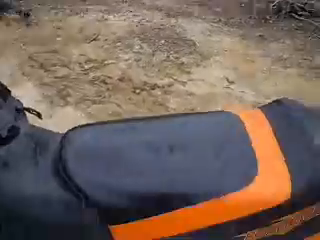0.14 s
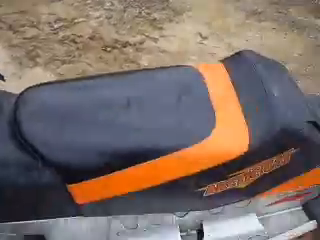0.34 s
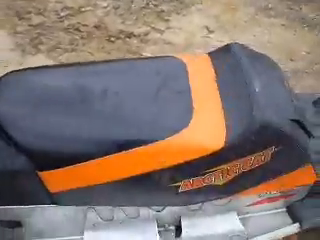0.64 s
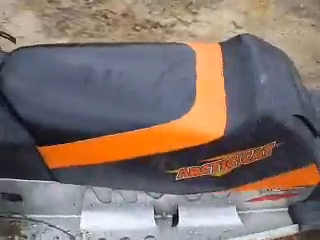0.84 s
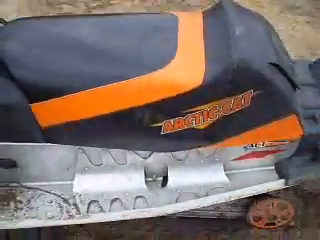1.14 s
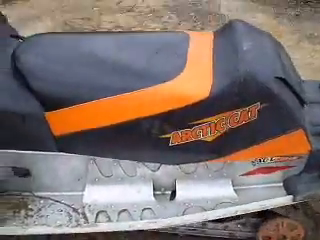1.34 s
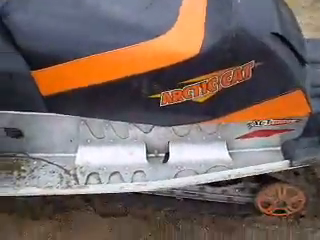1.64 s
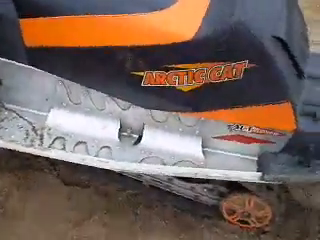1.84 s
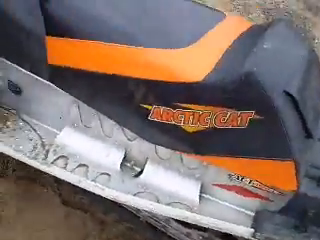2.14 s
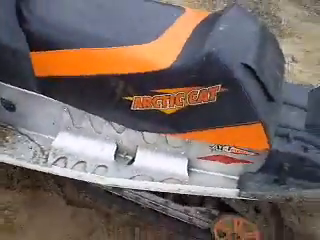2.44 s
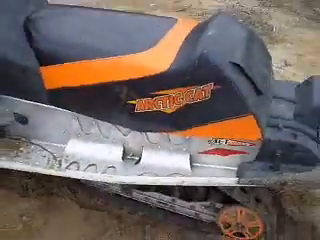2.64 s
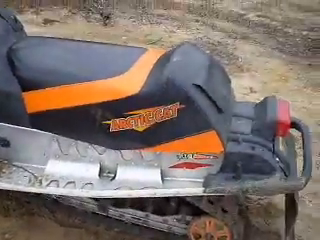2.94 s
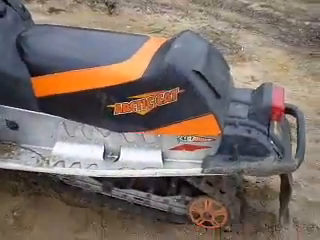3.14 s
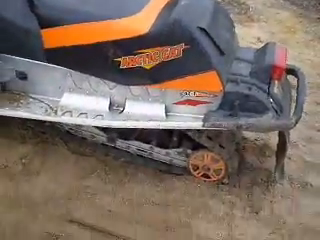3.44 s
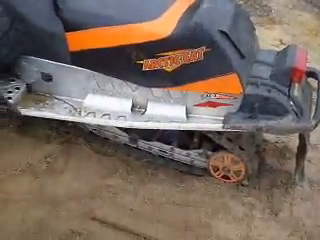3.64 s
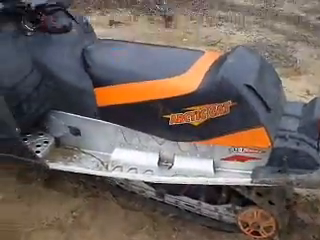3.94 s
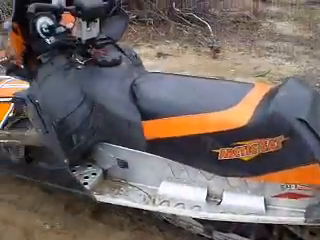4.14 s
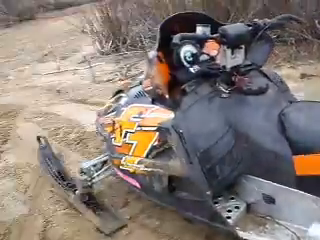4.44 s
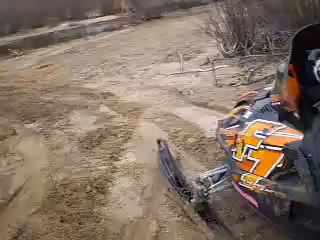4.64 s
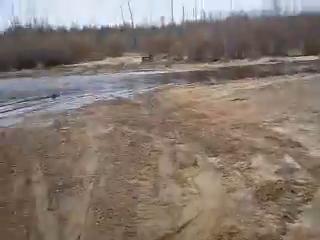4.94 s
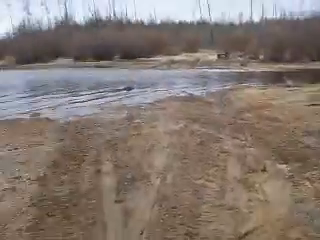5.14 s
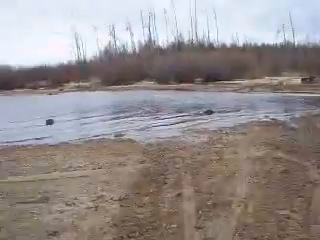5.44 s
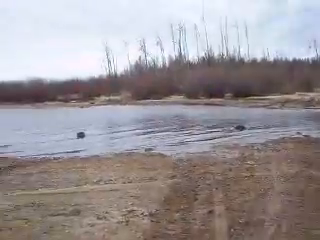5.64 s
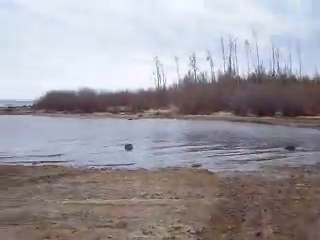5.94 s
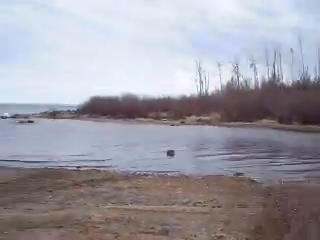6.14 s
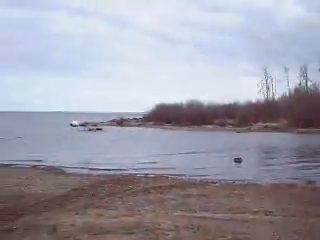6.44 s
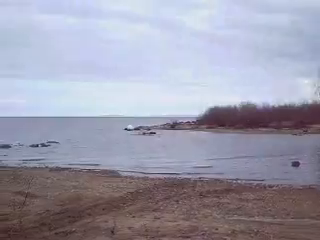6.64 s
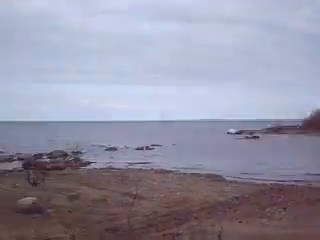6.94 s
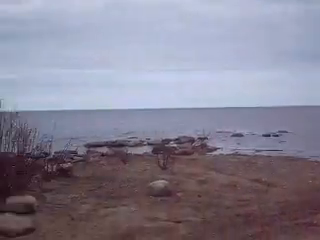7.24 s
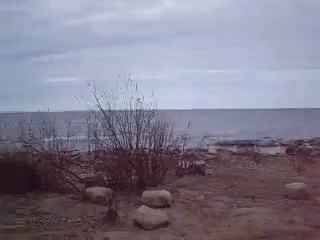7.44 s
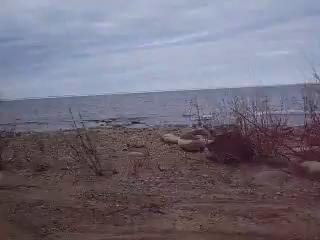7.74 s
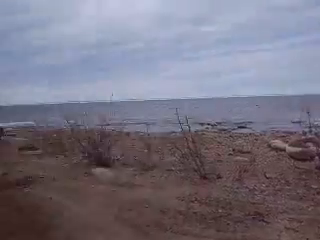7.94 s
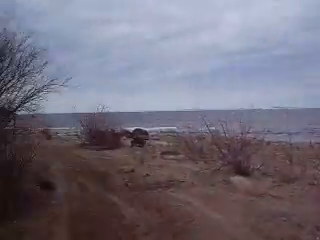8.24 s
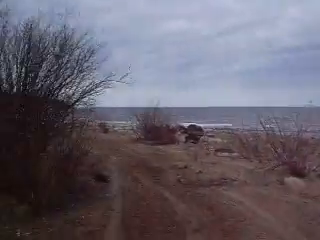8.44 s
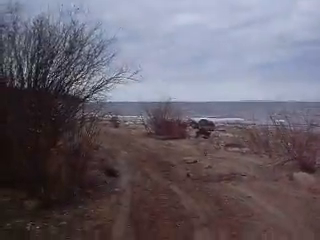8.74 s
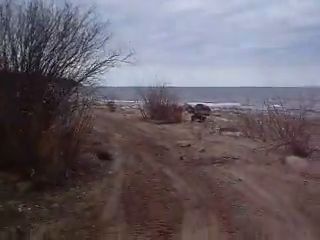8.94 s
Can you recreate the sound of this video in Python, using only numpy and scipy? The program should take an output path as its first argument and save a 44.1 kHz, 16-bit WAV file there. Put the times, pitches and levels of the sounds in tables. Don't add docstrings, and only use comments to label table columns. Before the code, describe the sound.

A two-stroke twin snowmobile engine runs close by on open ground, heard through a small, gritty, low-rate mono microphone with low wind buffeting, strongest at first and easing around 3.5 s before returning lightly. From 0 s the engine falls, blips at 0.3 s, drops with stray pops, then climbs around 1.2 s. Between 1 and 2 s gravel snaps, a loud click near 1.3 s, and a hand knocks and scuffs the case. From 2.4 to 2.9 s the engine lopes in a stuttering, regular misfire; another sharp snap comes at 2.9 s as it revs. Longer climbs follow at 3.5 and 4.2 s, then brisk blips near 4.8, 5.4 and 6.0 s, each cut abruptly, with raspier intake clatter. After 6.2 s it sinks to a fast, droning idle, slowly lowering in pitch, with breathy exhaust noise, faint pops and a few small ticks until 9 s.

```python
import sys
import numpy as np
from scipy import signal
from scipy.io import wavfile
from scipy.ndimage import uniform_filter1d

SR = 44100
rng = np.random.default_rng(int(sys.argv[2]) if len(sys.argv) > 2 else 0)


def master(y):
    cut = np.clip(np.atleast_2d(y).T, -1, 1)
    pcm = np.round(cut * 32767)
    wavfile.write(sys.argv[1], SR, pcm.astype(np.int16))


def how_loud(loudness_db):
    steps = np.asarray(loudness_db, float) / 20
    return 10 ** steps


N = 399987


def rms_one(x):
    return x / np.sqrt(np.mean(x ** 2) + 1e-20)


def in_time(rows):
    s, *columns = np.transpose(rows)
    return [np.interp(np.arange(N) / SR, s, c) for c in columns]


def drift(rate_hz):
    r = np.exp(-80 * np.pi * rate_hz / SR)
    noise = rng.standard_normal(N // 40 + 2002)
    slow = signal.lfilter([1], [1, -2 * r, r * r], noise)[2000:]
    return np.interp(np.arange(N) / 40, np.arange(len(slow)), rms_one(slow))


def band(x, low_hz, high_hz, order=2):
    return signal.sosfilt(signal.butter(order, [low_hz, high_hz], "band", fs=SR, output="sos"), x)


def ring(clicks, hz, t60_s):
    r, w = how_loud(-60 / (t60_s * SR)), 2 * np.pi * hz / SR
    return signal.lfilter([0, np.sin(w)], [1, -2 * r * np.cos(w), r * r], clicks + 1e-18)


# t/s, goal stroke rate f/Hz, lag/s, firing level/dB, pipe note level/dB
THROTTLE_MOVES = [(0, 74.5, 0.78, -16, -3.5), (.297, 162.4, 0.22, -12, -2), (.521, 75.7, 0.45, -22.5, -3),
                  (0.831, 101.7, .11, -18.5, -2), (1.17, 174.3, 0.78, -20, 0.5),
                  (1.302, 151.7, 0.075, -13.5, 1), (1.605, 101.8, 0.13, -19.5, -5),
                  (2.107, 177.3, 0.9, -20.5, -4), (2.337, 111, 0.46, -43, -5.5),
                  (2.93, 160.7, 0.17, -13.5, -2.5), (3.261, 98.8, 0.29, -14.5, -3.5),
                  (3.335, 99.2, .279, -28, 1.5), (3.545, 200, 0.35, -16, -0.5),
                  (3.817, 113.3, 0.14, -30, 2), (4.158, 200, 0.52, -14, 1.5), (4.46, 103.2, .141, -32, -3),
                  (4.843, 158.7, 0.16, -13.5, 0.5), (5.118, 95.8, 0.21, -41, -2),
                  (5.413, 165.9, 0.2, -13, 3), (5.642, 101.2, 0.16, -37, -2.5),
                  (5.955, 163.8, 0.17, -14, 5.5), (6.203, 96.2, 0.16, -27.5, 1),
                  (6.83, 74.7, 5.53, -44.5, 1.3)]
START_HZ = 138.45
FIRING_LEAD_S, FIRING_HANG_S = .025, 0.027


def throttle():
    t, rate_hz, now_hz = np.arange(N) / SR, np.zeros(N), START_HZ
    levels_db = np.zeros((2, N)) + np.transpose([THROTTLE_MOVES[0][3:]])
    ends_s = [row[0] for row in THROTTLE_MOVES[1:]] + [N / SR + 1]
    for (s, goal_hz, lag_s, *db), end_s in zip(THROTTLE_MOVES, ends_s):
        step_s = s - FIRING_LEAD_S if goal_hz > now_hz else s + FIRING_HANG_S
        levels_db[:, int(step_s * SR):] = np.transpose([db])
        span = slice(int(s * SR), int(end_s * SR))
        rate_hz[span] = goal_hz + (now_hz - goal_hz) * np.exp(-(t[span] - s) / lag_s)
        now_hz = goal_hz + (now_hz - goal_hz) * np.exp(-(end_s - s) / lag_s)
    rate_hz = uniform_filter1d(rate_hz, size=2000, mode="nearest")
    return rate_hz, *uniform_filter1d(levels_db, size=1200, mode="nearest")


# t/s, exhaust level/dB, exhaust tilt/dB per order, hood level/dB
CAMERA_AIM = [(0, -4.5, 4.3, -20.5), (.2, 1, 2.3, -29), (1.0, 0, -0.7, -30.5), (1.5, 1, -3.5, -31.5),
              (2.0, 3.5, -1.3, -37), (2.6, 8, 3.2, -44), (3.2, 1.5, -2.5, -42), (3.75, 5, 3.3, -32.5),
              (3.95, 5.2, 3.5, -34), (4.25, 2.5, 0, -22.5), (4.45, -2.5, 2, -23), (4.75, 1.5, 0, -24.5),
              (5.05, -1, -0.4, -20), (5.7, -0.5, -4.5, -25.5), (6.15, -5, -1.5, -21),
              (6.7, -6, -6.5, -42.5), (7.4, -3, -5.5, -41), (9.07, 2.5, -7, -39.5)]
HOOD_AWAY_DB, HOOD_FACING_DB = -37, -20.5


def view():
    exhaust_db, tilt_db, hood_db = in_time(CAMERA_AIM)
    facing = np.clip((hood_db - HOOD_AWAY_DB) / (HOOD_FACING_DB - HOOD_AWAY_DB), 0, 1)
    return exhaust_db, tilt_db, hood_db, facing


# f/Hz, open-throttle level/dB, shut-throttle level/dB, hood-side change/dB
LOWER_ORDERS = [(176.2, -16, -20, 19), (200, -14.5, -15, -1.9), (236, -10, -9.5, -1.3),
                (265, -21, -22, 3.5), (307.4, -10, -20.5, -7.5), (336.7, -12.5, -12, -9.5),
                (393.6, -23.5, -27.5, 1), (448, -24, -28.5, 3.5), (487, -18.5, -23, -2), (522, -24, -27, 8),
                (593.7, -35, -37.5, 14.5)]
ORDER_TILT = [.1, 0.48, 2.1]
FIRING_DB_PER_HZ = 0.39


def orders(rate_hz, firing_db, opening, exhaust_db, tilt_db, facing):
    hz, *columns = np.transpose(LOWER_ORDERS)
    levels_db = [firing_db + FIRING_DB_PER_HZ * (rate_hz - 140)]
    for k in (2, 3, 4):
        open_db, shut_db, hood_db = [np.interp(k * rate_hz, hz, c) for c in columns]
        tuned_db = opening * open_db + (1 - opening) * shut_db
        levels_db.append(tuned_db + facing * hood_db + exhaust_db + tilt_db * ORDER_TILT[k - 2])
    return levels_db


# f/Hz, firing level/dB re load, pumping level/dB re order 2
UPPER_ORDERS = [(418, 2, -30), (489.8, -22, -14), (565, -8.5, -32), (746, -22, -41), (947, -8, -42),
                (1010, -19, -34.5), (1400, -27.5, -53.5), (1750, -28.5, -53), (2503, -26.5, -45)]
# t/s, drop/dB, recovery/s
SNAP_SHUT = [
    (1.632, -11, 0.023),
    (3.861, 7, 0.034),
    (4.475, 8.5, 0.062),
    (5.15, 1, 0.044),
    (5.66, 9, 0.042),
    (6.218, 1.5, 0.06),
]
HOOD_PUMP_SHARE = 4.6


def strokes(rate_hz, turn, levels_db, bright_db):
    load_db = 1.3 * levels_db[0] + .3 * levels_db[3] + 6 + bright_db
    hz, fire_db, pump_db = np.transpose(UPPER_ORDERS)
    heights = [how_loud(db) for db in levels_db]
    for k in range(5, 15):
        fire = how_loud(load_db + np.interp(k * rate_hz, hz, fire_db))
        pump_level_db = levels_db[1] + HOOD_PUMP_SHARE * bright_db
        heights.append(fire + how_loud(pump_level_db + np.interp(k * rate_hz, hz, pump_db)))
    waver, out, t = .03 * drift(25.), 0, np.arange(N) / SR
    for k, height in enumerate(heights, 1):
        lag_rad = 1.15 * (k > 1) + .8 * (k - 2) * (k - 3) * (k > 3)
        flicker = how_loud(.6 * drift(18.))
        out = out + np.sqrt(2) * height * flicker * np.cos(k * (turn + waver) - lag_rad)
    for s, drop_db, back_s in SNAP_SHUT:
        out = out * how_loud(-drop_db * (t > s) * np.exp(-np.abs(t - s) / back_s))
    return out


def lope():
    start_s, gap_s, jitter_s = 2.388, 0.044, 0.0033
    return start_s + gap_s * np.arange(12) + jitter_s * rng.standard_normal(12)


# first t/s, last t/s, level/dB
STRAY_SPELLS = [(.022, .17, -2), (.224, .3, -3.5), (.587, .6, -12), (.664, .67, -8), (.747, .75, -3.5),
                (.836, .84, -5), (.929, 1.02, -4), (1.085, 1.28, -4), (1.656, 1.76, -5),
                (1.823, 2.02, -7.5), (2.061, 2.265, -5), (2.316, 2.38, -7.5), (3.297, 3.53, -4),
                (3.842, 3.89, -8), (3.929, 4.135, -3), (4.775, 4.85, -3), (5.281, 5.31, -9),
                (5.367, 5.4, -5), (5.673, 5.735, -13), (5.89, 5.97, -7.5), (6.351, 6.505, -13),
                (6.66, 6.73, -17), (6.873, 6.94, -9.5), (7.098, 7.285, -13.5), (7.447, 7.45, -11),
                (7.822, 7.93, -22), (8.055, 8.41, -17), (8.484, 8.575, -22), (8.679, 8.925, -17.5),
                (8.998, 9.055, -16)]
CATCH_GAPS = [2, 3, 3, 3, 3, 3, 3, 4]
LOPE_DB, CATCH_SPREAD_DB = -9.5, 1.5


def catches(at, lope_s):
    spells = [*STRAY_SPELLS] + [(s + .011, s + .042, LOPE_DB) for s in lope_s]
    gaps = rng.choice(CATCH_GAPS, (len(spells), 20))
    chance, rows = rng.standard_normal((len(spells), 20)), []
    for (first_s, last_s, db), gap, spread in zip(spells, gaps, chance):
        stroke = np.searchsorted(at, (first_s - .007) * SR) + np.cumsum(gap) - gap[0]
        s = at[np.minimum(stroke, len(at) - 1)] / SR + .003
        s = s[:max(1, np.sum(s < last_s))]
        rows += [(a, db + CATCH_SPREAD_DB * np.tanh(b)) for a, b in zip(s, spread)]
    return np.transpose(rows)


# f/Hz, level/dB, t60/s
EXHAUST_MODES = [(137.9, -1, 0.081), (175.4, 0.5, 0.074), (249.5, -3.5, .075), (346.2, -6, 0.094),
                 (487, -12.5, 0.059)]


def pops(at, uneven_db, caught):
    s, db = caught
    fired = ((s - .003) * SR).astype(int)
    shares = rng.standard_normal((400, len(EXHAUST_MODES)))
    uneven = rng.standard_normal((N // 200, len(EXHAUST_MODES)))
    out = 0
    for (hz, mode_db, t60_s), share, chance in zip(EXHAUST_MODES, shares.T, uneven.T):
        kicks = np.zeros(N)
        kicks[at] = how_loud(uneven_db[at]) * chance[:len(at)]
        kicks[fired] += how_loud(db - 5) * (1 + share[:len(s)] / 5)
        out = out + how_loud(mode_db) * ring(kicks, hz, t60_s)
    return band(out, 95, 620, order=3)


# f/Hz, width/Hz, level/dB
HOOD_MODES = [(1428, 170, -3), (1300, 57, -6.5), (1045, 86, -12), (2330, 400, -19.5)]


def clatter(turn, level_db):
    gated = rng.standard_normal(N) * how_loud(2.9 * np.cos(turn - 1.2) + 1.7 * drift(30.))
    out = sum(how_loud(db) * rms_one(band(gated, hz - w / 2, hz + w / 2)) for hz, w, db in HOOD_MODES)
    return how_loud(level_db) * out


# f/Hz, density level/dB per Hz
RUSH_COLOUR = [(320, -24.5), (550, -3.5), (959, 1.5), (1250, -3.5), (1790, -10), (2150, -8.5),
               (3070, -15.5), (4000, -12.5), (5200, -32), (8800, -120)]


def rush(turn, level_db):
    out, together, edges_hz = 0, drift(12.), 340 * 2 ** np.arange(0, 4.1, .5)
    white, (hz, db) = rng.standard_normal((2, N)), np.transpose(RUSH_COLOUR)
    for k, (low_hz, high_hz) in enumerate(zip(edges_hz, edges_hz[1:])):
        colour_db = np.interp(np.log(low_hz * high_hz) / 2, np.log(hz), db)
        gain = how_loud(colour_db + 1.2 * together + 1.0 * drift(28.0))
        out = out + gain * band(white[k % 2], low_hz, high_hz)
    scale = np.std(band(out, 1900, 3800))
    return how_loud(level_db + 1.6 * np.cos(turn)) * out / scale


# t/s, level/dB
WIND_GUSTS = [
    (0.0, -40),
    (0.1, -30.5),
    (3.53, -43),
    (3.58, -57),
    (4.09, -35),
    (4.19, -42),
    (8.97, -44.5),
    (9.07, -49),
]


def wind():
    level_db = in_time(WIND_GUSTS)[0]
    return how_loud(level_db + 0.95 * drift(21.0)) * rms_one(band(rng.standard_normal(N), 22, 90))


DEAD_STROKES = [0.193, 0.757, 0.786, 1.642, 1.666, 1.702, 2.02, 2.183, 2.315, 3.372, 3.403, 3.532, 3.894,
                3.965, 3.982, 4.012, 4.041, 4.054, 4.13, 7.936, 8.107, 8.169, 8.689, 8.732, 8.766, 8.929,
                9.019]


def misses(lope_s, caught):
    swell_peak_db, starve_db, catch_s = 13, 8.5, 0.0076
    t, gain_db = np.arange(-2000, 2000) / SR, np.zeros(N + 4000)
    sag_db = -9.5 * np.exp(-(t / np.where(t < 0, .012, .004)) ** 2)
    swell_db = swell_peak_db * np.exp(-(t / catch_s) ** 2)
    swell_db = swell_db - starve_db * np.exp(-(t / catch_s / 2.23) ** 2)
    shapes = [(s, sag_db) for s in [*DEAD_STROKES, *lope_s]]
    shapes += [(s, how_loud(db) * swell_db) for s, db in zip(*caught)]
    for s, shape_db in shapes:
        i = int(s * SR)
        gain_db[i:i + len(t)] += shape_db
    return how_loud(gain_db[2000:N + 2000])


# t/s, peak level/dB, centre f/Hz
GRAVEL_SNAPS = [(1.071, -6, 1706), (1.2447, -20, 1790), (1.3361, 6.5, 2400), (1.3573, -12, 1880),
                (1.546, -16, 1750), (1.5858, -21, 1750), (1.6527, -8, 2886), (1.6792, -19, 2139),
                (1.721, -19, 2262), (1.7454, -12, 2840), (1.8218, -11, 2110), (1.8653, -37, 1850),
                (1.9812, -9.5, 1910), (2.257, -16, 1700), (2.8821, 4.5, 2105), (2.8958, -18, 1820),
                (3.1016, -11, 1825), (3.617, -12, 1711), (3.988, -16, 1926), (5.9519, -27, 1709),
                (5.994, -9, 1973), (8.525, -13, 1941), (8.997, -26.5, 2232)]
# t/s, peak level/dB, centre f/Hz, t60/s, spread/octaves
CASE_KNOCKS = [(1.3361, -11.5, 2050, 0.27, .3), (1.586, -13, 800, .03, 1.3), (1.653, -12, 690, 0.039, 1.6),
               (1.675, -7, 709, 0.04, 1.23), (1.722, -17, 790, 0.026, 1.1), (1.801, -21, 1300, 0.16, 0.15),
               (1.868, -22, 700, .03, 1.1), (1.94, -12, 1482, 0.041, 0.22), (1.946, -16, 1300, 0.058, 0.51),
               (1.98, -13, 850, 0.072, 0.95), (2.8815, -12, 2224, 0.029, 0.25),
               (2.8825, -10, 3200, 0.019, .12), (5.722, -26, 3884, 0.017, 0.2),
               (6.24, -16, 1400, 0.059, 0.47), (7.38, -23, 4093, 0.019, 0.38),
               (8.252, -24.5, 3670, 0.022, 0.22), (8.407, -20.5, 2770, 0.014, 0.3),
               (8.525, -13, 833.3, .025, 1.7), (8.998, -14, 833.3, 0.029, 1.1)]


def snaps():
    out, t = np.zeros(N + 4000), np.arange(4000) / SR
    rows = [(*row, .018, 2.8) for row in GRAVEL_SNAPS] + [*CASE_KNOCKS]
    grits = rng.standard_normal((len(rows), len(t)))
    for (s, db, hz, t60_s, octaves), grit in zip(rows, grits):
        half = 2 ** (np.clip(octaves, .1, 4) / 2)
        burst = band(grit * how_loud(-60 * t / t60_s), hz / half, hz * half)
        i = int(s * SR)
        out[i:i + len(t)] += how_loud(db) * burst / np.abs(burst).max()
    return out[:N]


# start t/s, end t/s, level/dB
HAND_SLIDES = [
    (1.236, 1.297, -27.5),
    (1.347, 1.42, -25),
    (1.527, 1.741, -29),
    (2.886, 2.927, -30),
]


def scuffs():
    t = np.arange(N) / SR
    grains = rng.standard_normal(N) * (rng.random(N) < .03) * how_loud(4.0 * drift(80.))
    touch = sum(how_loud(db) * (t > start_s) * (t < end_s) for start_s, end_s, db in HAND_SLIDES)
    return uniform_filter1d(touch, size=300) * rms_one(band(grains, 1400, 2900, order=1))


FIRING_SHUT_DB, FIRING_OPEN_DB = -23, -16
UNEVEN_SHUT_DB, UNEVEN_OPEN_DB = -19.5, -25.5
HOOD_BRIGHT_DB = 0.5
RUSH_DB, RUSH_WITH_EXHAUST, RUSH_WITH_HOOD = -38.5, 0.33, 0.065


def scene():
    rate_hz, firing_db, note_db = throttle()
    opening = np.clip((firing_db - FIRING_SHUT_DB) / (FIRING_OPEN_DB - FIRING_SHUT_DB), 0, 1)
    exhaust_db, tilt_db, hood_db, facing = view()
    levels_db = orders(rate_hz, firing_db, opening, exhaust_db + note_db, tilt_db, facing)
    turn = 2 * np.pi * np.cumsum(rate_hz) / SR
    steady = strokes(rate_hz, turn, levels_db, HOOD_BRIGHT_DB * facing)

    at = np.flatnonzero(np.diff((turn + 1.2) // (2 * np.pi)))
    lope_s = lope()
    caught = catches(at, lope_s)
    uneven_db = UNEVEN_SHUT_DB + opening * (UNEVEN_OPEN_DB - UNEVEN_SHUT_DB) + exhaust_db
    exhaust = steady * misses(lope_s, caught) + pops(at, uneven_db, caught)

    effort_db = 0.067 * (levels_db[0] + 34)
    rush_db = RUSH_DB + RUSH_WITH_EXHAUST * exhaust_db + RUSH_WITH_HOOD * (hood_db + 22)
    noise = clatter(turn, hood_db + effort_db) + rush(turn, rush_db + effort_db) + wind()
    return (exhaust + noise + snaps() + scuffs())[None]


def top_cut(x):
    return signal.sosfilt(signal.butter(12, 12510, fs=SR, output="sos"), x)


def record(dry):
    camera_hz, steps, cutoff_hz = 8001.43, 128, 13300
    x = signal.sosfilt(signal.butter(4, 3900, fs=SR, output="sos"), dry)
    x = x / (1 + np.abs(x / 1.1) ** 6) ** (1 / 6)
    tick = np.floor(np.arange(N) * camera_hz / SR)
    sampled = np.interp(tick * SR / camera_hz, np.arange(N), x[0])
    held = np.floor(np.clip(sampled, -1, .99) * steps) / steps
    smooth = signal.sosfilt(signal.cheby2(14, 60, cutoff_hz, fs=SR, output="sos"), held[None])
    return top_cut(smooth)


dry = scene()
out = record(dry)
master(out)
```